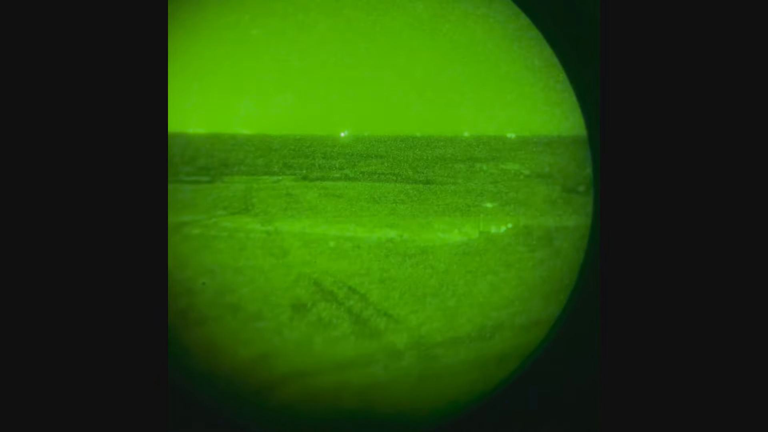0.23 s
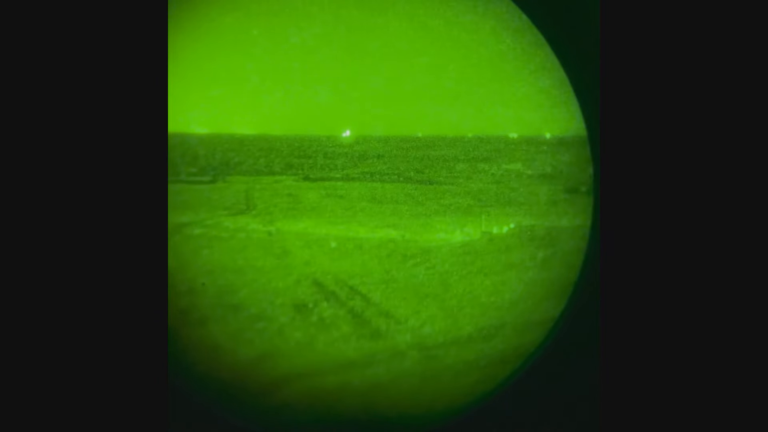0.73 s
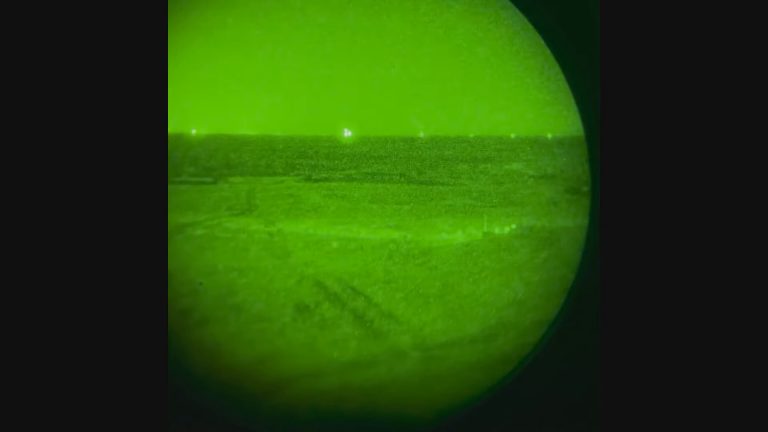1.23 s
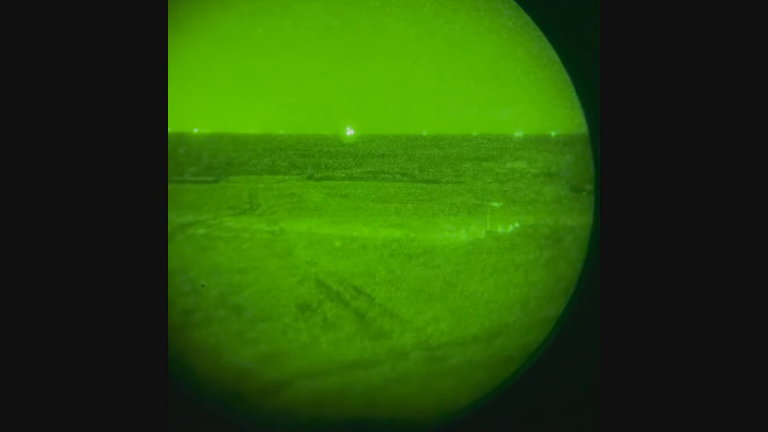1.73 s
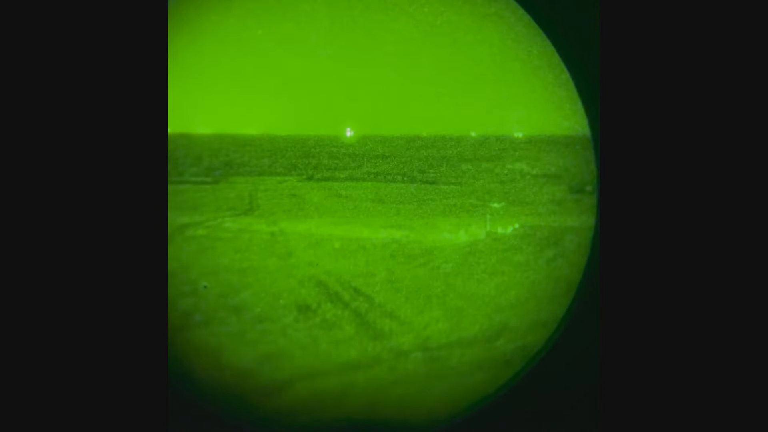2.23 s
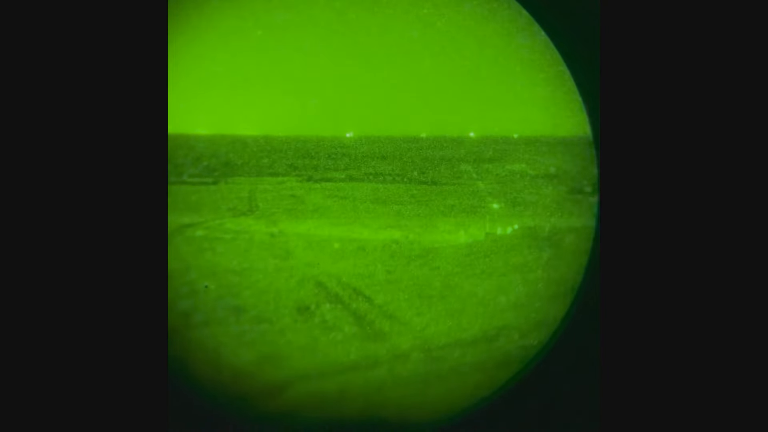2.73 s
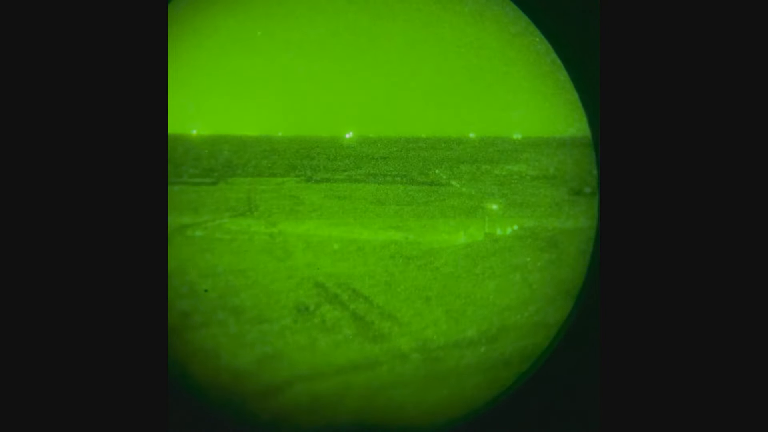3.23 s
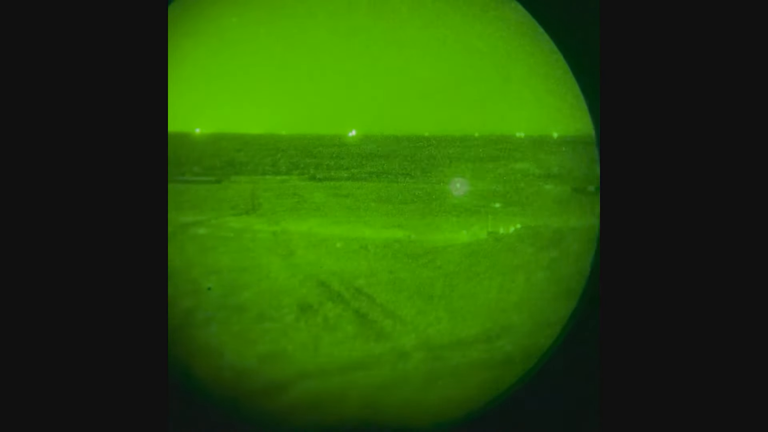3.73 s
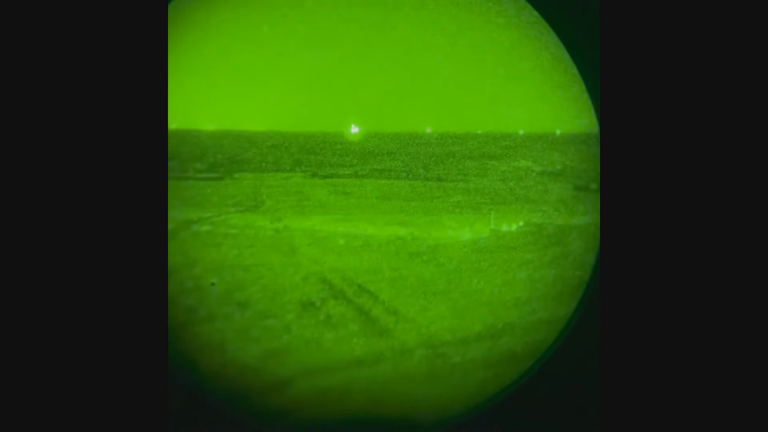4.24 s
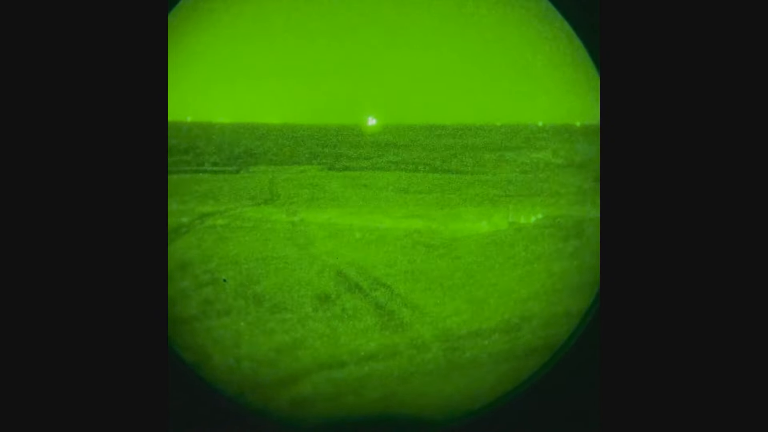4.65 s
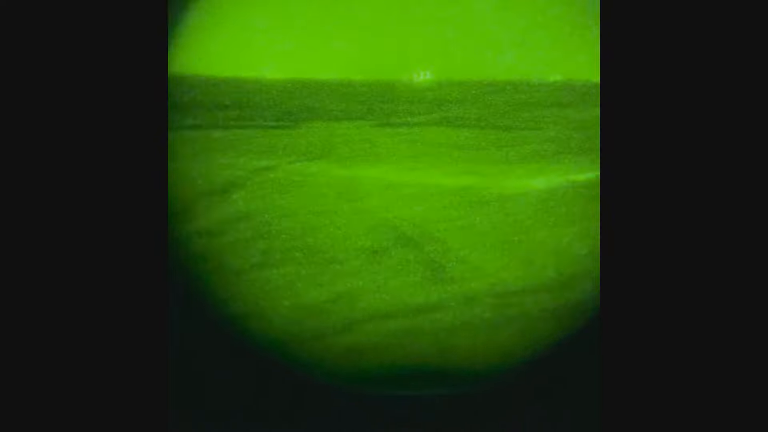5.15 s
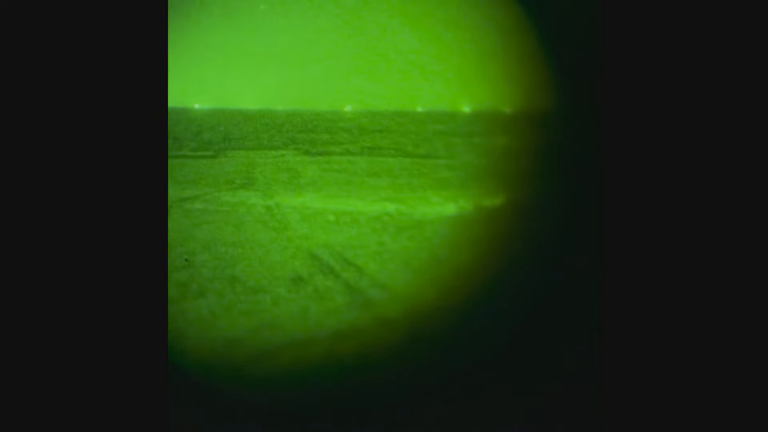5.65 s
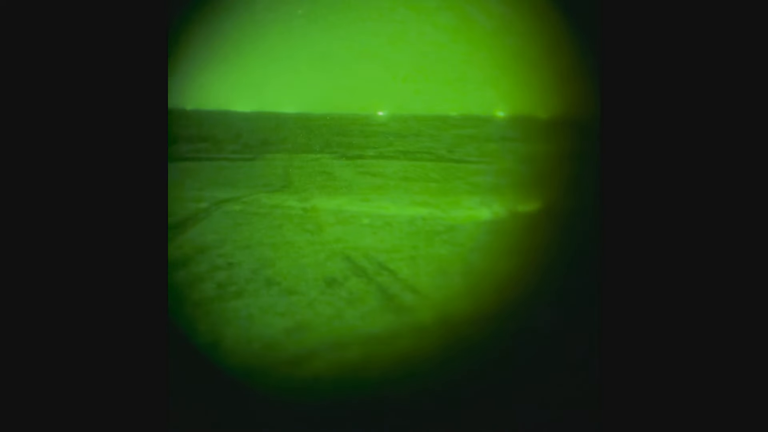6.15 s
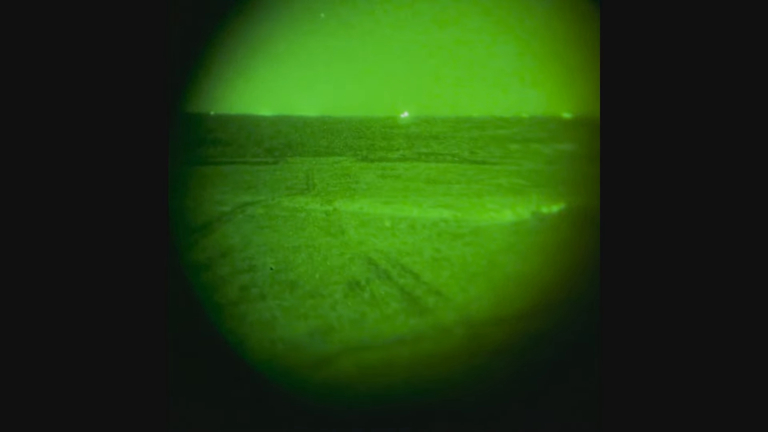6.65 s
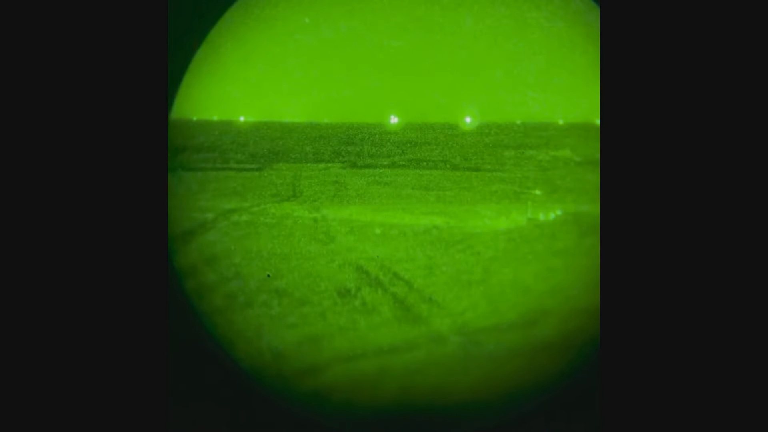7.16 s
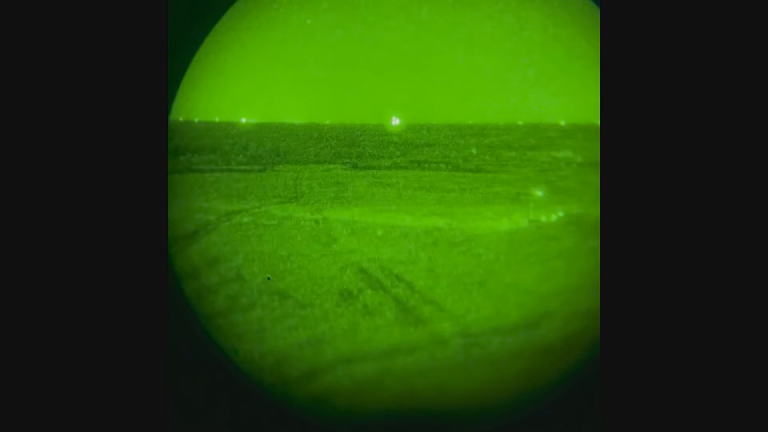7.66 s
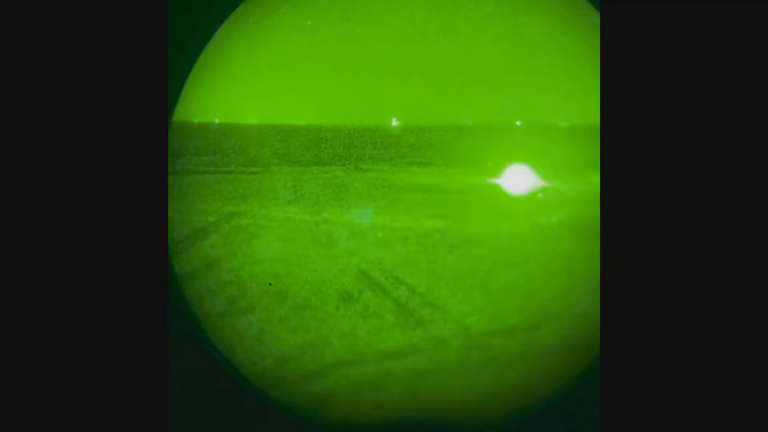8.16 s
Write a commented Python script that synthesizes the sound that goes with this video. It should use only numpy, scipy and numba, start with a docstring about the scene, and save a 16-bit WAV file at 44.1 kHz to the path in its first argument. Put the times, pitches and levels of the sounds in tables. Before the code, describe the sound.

Irregular, dulled gunshots pop far off across an open plain and fade, over the steady rumble and clatter of nearby idling diesel engines. A closer machine gun then fires about eleven rapid, cracking shots that echo off the banks, trailed by a brief falling ricochet whine. One hollow knock hits the phone microphone's case. The engines carry on until two sharp shots ring out at the close.

```python
"""A far gun rattles over two diesel engines idling close by, on a flat range at night.
Then a nearer machine gun fires bursts: each shot is a crack, a muzzle blast and a hiss of gas, which
banks and the plain reflect as a rolling echo. A ricochet whines past, and a knock on the phone's case
makes its limiter duck. The two microphone ports share the bass and part in phase above it."""
import sys
import numpy as np
from scipy import signal
from scipy.fft import rfft, irfft
from scipy.io import wavfile
from scipy.ndimage import uniform_filter1d, minimum_filter1d
from numba import njit

SR = 44100
rng = np.random.default_rng(int(sys.argv[2]) if len(sys.argv) > 2 else 0)


def dump(signal):
    """Clip the signal to [-1, 1] and save it as 16-bit WAV at the path in sys.argv[1]."""
    limited = np.clip(np.atleast_2d(signal).T, -1, 1)
    pcm = np.round(limited * 32767).astype(np.int16)
    wavfile.write(sys.argv[1], SR, pcm)


N = 370440
TIME = np.arange(N) / SR
HZ = np.fft.rfftfreq(N, 1 / SR) + 1e-6

# Idling engines. Each row: cycle rate in Hz, a list of (harmonic number, rms level in dB).
ENGINE_HARMONICS = [(19.65, [(3, -36.5), (4, -37.5), (5, -42.5), (6, -48.5), (7, -51), (8, -53.5),
                    (10, -55), (11, -58), (12, -54.5), (14, -52.5), (16, -55.5)]), (21.5, [(2, -48.5),
                    (3, -39.5), (4, -35), (6, -46.5), (7, -52.5), (9, -54.5), (11, -52.5), (13, -52.5)])]
# Spectrum of engine roar and clatter. Each row: frequency in Hz, relative level in dB.
ENGINE_SPECTRUM = [(30, -26), (50, 7.5), (90, 2.5), (200, 0), (320, -7), (500, -10.5), (900, -24.5),
                   (1600, -24.5), (2450, -26.5), (3000, -36.5), (4200, -30), (6200, -33), (7200, -31),
                   (7800, -34.5), (8800, -38), (10400, -38), (11300, -30.5)]
# Peaks and dips of the engine casing. Each row: centre in Hz, width in Hz, gain in dB.
CASING_RESONANCES = [(860, 116, 9.5), (1280, 200, 4), (1710, 50, 7), (1900, 120, -5), (2100, 44, 1.5),
                     (2420, 83, -2.5), (2540, 70, 3), (2745, 380, 10.5), (2730, 60, -7), (3730, 50, 6),
                     (4140, 44, 6.5), (4350, 50, -7), (4460, 41, 5.5)]
# Level of the faint high hiss above 8 kHz. Each row: time in seconds, gain in dB.
TREBLE_HISS_LEVEL = [(0, -3), (1.5, 3.5), (1.8, 9.5), (3, 1.5), (6.2, 6), (8.4, 4.5)]
# Faint ticks close by. Each row: start in seconds, level in dB.
TICK_EVENTS = [(1.6008, -36), (1.9594, -41), (2.58, -40), (6.5585, -40), (7.6869, -45)]
# Distant pings: far shots, then late echoes of the near gun.
# Each row: start in seconds, level in dB, pitch in Hz, T60 in seconds.
DISTANT_PINGS = [(0.0416, -19.5, 1975, .05), (0.1087, -34, 2270, .05), (0.1444, -16, 2324, 0.0423),
                 (0.1622, -21, 1753, .05), (0.238, -16.5, 2290, .04), (0.279, -21, 2240, 0.047),
                 (0.2857, -17, 2036, .05), (0.296, -22, 2040, .04), (0.327, -17, 2303, 0.0567),
                 (0.374, -15, 1990, 0.0564), (0.392, -18.5, 2020, 0.066), (0.4637, -16, 1990, .07),
                 (0.479, -23, 2060, .04), (0.513, -18.5, 2080, .05), (0.5261, -11.5, 1980, 0.014),
                 (0.617, -12.5, 2330, .045), (0.634, -19, 1845, .05), (0.75, -16.5, 2086, .05),
                 (0.855, -25.5, 2223, 0.1), (0.9393, -22.5, 2130, .07), (1.1034, -17, 2000, 0.0533),
                 (1.119, -20, 1840, .03), (1.135, -20.5, 1970, 0.092), (1.2312, -21.5, 2176, 0.061),
                 (4.44, -25, 1750, 0.0305), (4.544, -34, 1710, 0.036), (4.4787, -20, 1950, 0.0427)]
# Duller pops down range. Each row: start in seconds, level in dB, pitch in Hz.
DISTANT_POPS = [(0.274, -13.5, 780), (0.7424, -14, 700), (1.364, -20.5, 805), (4.481, -17, 1350),
                (7.715, -31, 785), (8.221, -35, 800)]
# Envelope of the far gun's echo. Each row: time in seconds, level in dB.
FAR_ECHO_LEVEL = [(0, -35), (1.2, -40.5), (1.6, -47.5), (2.6, -52), (3.1, -57)]
# Spectrum of that echo. Each row: frequency in Hz, relative level in dB.
FAR_ECHO_SPECTRUM = [(500, -12), (800, 1.5), (1100, 2.5), (1400, 3), (1900, 0.5), (2400, 3), (2750, -2.5),
                     (3300, -18.5), (4500, -22), (7000, -83)]
# Spectrum of the horizon's rumble. Each row: frequency in Hz, relative level in dB.
RUMBLE_SPECTRUM = [(60, -14), (130, -9.5), (300, -2.5), (550, -7.5), (1000, -17.5), (2400, -25.5),
                   (3200, -41)]
# Reverberation of the plain. Each row: band centre in Hz, near ground gain in dB, its T60 in seconds,
# far ground gain in dB, its T60 in seconds.
PLAIN_BANDS = [(78, -2.5, 0.16, -13, 4.2), (138.4, -9, 0.2, -17, 5.1), (262.4, -7, 0.19, -14, 3.14),
               (440, -16.5, 0.47, -21, 4.3), (820, -2.5, 0.072, -29, 1.6), (1420, -16.5, 0.17, -22, 4.7),
               (2120, -14.5, 0.16, -12, 1.8), (3150, -20.5, 0.13, -33, 1.2), (4190, -12, 0.066, -27, 3.05),
               (6200, -30.5, 0.41, -22.5, 1.5), (7000, -19, 0.13, -27, 0.56)]
# Reflecting banks. Each row: echo delay in seconds, gain in dB ahead of the echo filter.
BANK_REFLECTIONS = [(.018, -17), (.178, -9.5), (0.274, -4), (0.304, -14), (.382, -17), (.5, -13),
                    (.658, -6.5)]
# Filter on the echoes of banks and posts. Each row: frequency in Hz, gain in dB.
ECHO_FILTER = [(500, -26), (900, -9), (1400, -8), (2000, -4), (2500, -9), (2900, -33), (4200, -11),
               (5200, -25), (7100, -16.5), (8000, -41)]
# Spectrum of the muzzle gas. Each row: frequency in Hz, relative level in dB.
GAS_SPECTRUM = [(2500, -51), (3300, -9), (4300, 0.5), (5000, -2.5), (6000, -2.5), (7100, 4), (7900, -4),
                (10200, -8.5), (11000, -9.5)]
# Rings of the crack. Each row: frequency in Hz, T60 in seconds, gain in dB, dB added per dB of edge.
CRACK_RINGS = [(717, 0.025, -19, -0.1), (870, 0.041, -6, -0.44), (1025, 0.04, -13, -0.2),
               (1138, 0.046, -16, -0.82), (1346, 0.023, -5.5, -0.15), (1438, 0.025, -6.5, 0.32),
               (1530, 0.035, -3, -0.089), (1780, 0.027, -17, -0.076), (2015, 0.022, -17, 0.21),
               (2330, 0.045, 2, -0.36), (2790, 0.012, -9, 0.8), (2980, 0.0085, -15, 0.9),
               (3300, 0.0088, -21, 0.43)]
# Shots of the near gun. Each row: start in seconds, level in dB, extra gas hiss in dB,
# blast lag in milliseconds, edge of the crack in dB.
NEAR_SHOTS = [(3.1321, -20.5, 1.5, 2.65, -3), (3.2383, -21, 1, 2.57, -2), (3.3443, -21.5, 3, 2.8, 0),
              (3.4567, -22.5, 1, 2.3, 1), (3.5632, -20.5, 1.5, 2.04, 4), (3.668, -22.5, 4, 2.2, 2),
              (3.7795, -21.5, 4, 2, 6), (3.8838, -22, 4.5, 2.34, -3), (3.9912, -24, 6.5, 2.5, -4),
              (4.096, -24, 7, 3.05, -8), (4.2035, -21.5, 2.5, 2.05, -2), (8.2888, -22.5, -8, 2.4, 15),
              (8.3905, -23.5, -5, 2.4, 10.5)]
# The two microphone ports. Each row: frequency in Hz, phase lag of the right in radians,
# diffuse coherence from 0 to 1, left minus right in dB.
PORT_RESPONSE = [(200, 0, .97, 0), (400, .45, .95, -3), (650, 1.4, .55, 4), (830, .5, .8, 1),
                 (1030, 1.5, .35, 2), (1200, -1.2, .6, 4), (1600, .3, .85, 1.5), (2300, .7, .8, 2.5),
                 (2950, 2.9, .6, 0), (3500, 6.9, .5, -3), (4200, 7.9, .6, 4), (4850, 9.4, .9, 0),
                 (5900, 12.5, 1, 0), (7300, 13.9, .8, 0), (8300, 15.7, 1, 0), (9600, 15.8, 1, 0),
                 (11200, 17.7, .6, 0)]


def undb(db):
    """Decibels as an amplitude ratio."""
    return 10 ** (np.asarray(db) / 20)


def unit(x):
    """Scale to rms 1."""
    return x / np.sqrt(np.mean(x ** 2))


def curve(table):
    """Interpolate (seconds, value) rows at every sample."""
    return np.interp(TIME, *np.transpose(table))


def coloured(table, x):
    """Filter by (Hz, dB) points."""
    hz, db = np.transpose(table)
    return irfft(rfft(x) * undb(np.interp(np.log(HZ), np.log(hz), db)), N)


def band(x, hz, octaves):
    """Band-pass around hz."""
    edges = [hz * 2 ** (-octaves / 2), hz * 2 ** (octaves / 2)]
    return signal.sosfilt(signal.butter(2, edges, "band", fs=SR, output="sos"), x)


def walk(rate):
    """Smooth random drift, with rate new values a second and a spread near 1."""
    hold = int(SR / rate)
    steps = np.repeat(rng.standard_normal(N // hold + 1), hold)
    return 1.384 * uniform_filter1d(uniform_filter1d(steps, hold), hold)[:N]


def add(out, s, sound):
    """Mix a short sound in at s seconds."""
    i = int(s * SR)
    out[i:i + len(sound)] += sound[:N - i]


def rise(t, rise_s):
    """Smooth onset from 0 to 1."""
    return 1 - np.exp(-(t / rise_s) ** 2)


def ring(hz, t60, rough=0.35, rise_s=0.00041, octaves=0.33):
    """A damped oscillation, roughened by a band of noise as by air turbulence."""
    t = TIME[:int(t60 * SR)]
    grit = unit(band(rng.standard_normal(len(t)), hz, octaves))
    decay = 1000 ** (-t / t60) - 1 / 1000
    return (np.sin(2 * np.pi * hz * t) + rough * grit) * decay * rise(t, rise_s)


def engines():
    """Periodic firing makes exhaust harmonics and modulates the clatter. Returns (direct, diffuse)."""
    exhaust, throb = 0, 0
    for cycle_hz, harmonics in ENGINE_HARMONICS:
        cycles = np.cumsum(cycle_hz * (1 + 0.00399 * walk(2.5))) / SR
        for k, db in harmonics:
            amplitude = np.sqrt(2) * undb(db + 1.3 * walk(4))
            exhaust += amplitude * np.sin(2 * np.pi * (k * cycles + rng.random()))
        throb += np.exp(-(cycles % 1) / 0.71)
    casing_db = sum(db * np.exp(-((HZ - hz) / width) ** 2) for hz, width, db in CASING_RESONANCES)
    spectrum = rfft(unit(coloured(ENGINE_SPECTRUM, rng.standard_normal((2, N))))) * undb(casing_db)
    edges_hz = [0, 600, 1300, 2100, 3000, 4800, 6500, 8000, SR]
    roar, *clatter = (irfft(spectrum * ((HZ > lo) & (HZ <= hi)), N)
                      for lo, hi in zip(edges_hz, edges_hz[1:]))
    clatter[-1] *= undb(curve(TREBLE_HISS_LEVEL))
    # each band rattles on its own, and all surge together
    surge_db = 0.95 * walk(11)
    rattle = sum(part * undb(surge_db + 1.15 * walk(25) + .5 * walk(2.73)) for part in clatter)
    return exhaust, undb(-38 + walk(5.8)) * roar + unit(1 + 1.6 * throb) * undb(-38) * rattle


def ticks():
    """Heavily damped high rings are heard as tiny bright ticks."""
    out = np.zeros(N)
    for s, db in TICK_EVENTS:
        add(out, s, undb(db) * ring(10130, 0.014, rough=0.94))
    return out


def distant_reports():
    """Absorption over distance dulls far shots and the near gun's late echoes to pings and pops.
    Returns these as direct sound, and the far gun's rolling echo as diffuse sound."""
    hits = np.zeros(N)
    for s, db, hz, t60 in DISTANT_PINGS:
        add(hits, s - .06 * t60, undb(db) * ring(hz, t60, rough=0.7, rise_s=0.11 * t60, octaves=0.3))
        grit = ring(2074, 0.021, rough=1, rise_s=0.002, octaves=1)
        add(hits, s - .001, undb(db - 10) * grit)
        echo_s = s + 0.014 + .02 * rng.random()
        echo_hz = hz * 2 ** (.12 * rng.standard_normal())
        add(hits, echo_s, undb(db - 13.5) * ring(echo_hz, 0.035, rough=1.2, rise_s=0.0035, octaves=.4))
    for s, db, hz in DISTANT_POPS:
        pop = ring(hz, 0.023, rough=0.41, rise_s=0.0018, octaves=0.7)
        crack = ring(1270, 0.023, rough=0.86, rise_s=0.0012, octaves=0.24)
        add(hits, s - .001, undb(db) * (pop + undb(-9.5) * crack))
    hits = signal.sosfilt(signal.butter(8, 2700, fs=SR, output="sos"), hits)
    roll = unit(coloured(FAR_ECHO_SPECTRUM, rng.standard_normal((2, N))))
    roll *= undb(curve(FAR_ECHO_LEVEL) + 2.1 * walk(39.74))
    bass = unit(band(rng.standard_normal((2, N)), 330, 1.3)) * undb(-34) * 1000 ** (-TIME / 9.7)
    return hits, roll + bass


def ricochet(peak_s=4.735, peak_hz=2060, fall_octaves_per_s=3.1):
    """A tumbling bullet whines past: a fluttering tone that glides down in pitch."""
    t = TIME - peak_s
    hz = peak_hz * 2 ** (-fall_octaves_per_s * np.clip(t, -.5, .5))
    swell = np.exp(-(t / np.where(t < 0, .04, .075)) ** 2)
    level = swell * undb(-43 + 2.2 * walk(40))
    return level * np.sin(2 * np.pi * np.cumsum(hz * (1 + 0.005 * walk(60))) / SR)


def knock(start_s=5.31, gain_db=8):
    """An impact excites the damped modes of the phone's case."""
    out = np.zeros(N)
    # the click
    add(out, start_s, undb(-34) * ring(10000, 0.01, rough=0.46, octaves=0.62))
    add(out, start_s, undb(-40) * ring(12510, 0.006, rough=0.4, octaves=0.2))
    add(out, start_s, undb(-20) * ring(1500, 0.018, rough=0.25))
    add(out, start_s, undb(-38) * ring(5700, 0.011, rough=0.72))
    add(out, start_s, undb(-31) * ring(2600, 0.013, rough=0.27))
    # hollow rings
    t = TIME[:int(.03 * SR)]
    swell = np.exp(-((t - .003) / 0.0038) ** 2)
    hollow = np.sin(2 * np.pi * 530 * t) - undb(-5.5) * np.sin(2 * np.pi * 770 * t) * np.exp(-t / .006)
    add(out, start_s + .0009, undb(-14) * ring(963, 0.025, rough=.1))
    add(out, start_s + .0009, swell * hollow)
    # a low rebound, then a small bounce
    add(out, start_s + .0047, undb(22) * ring(225, 0.01, rough=0, rise_s=0.004))
    add(out, start_s + .0082, ring(60, 0.02, rough=0, rise_s=0.002))
    add(out, start_s + .032, undb(-26) * ring(520, 0.043))
    return undb(gain_db) * out


def horizon_rumble(rise_s=1, t60=12.14):
    """Incoherent returns from the horizon add in power, so the shots build a dull, lingering roar."""
    coarse_time = TIME[::441]
    shot_s, shot_db, *_ = np.transpose(NEAR_SHOTS)[:, :, None]
    age = np.maximum(coarse_time - shot_s, 0)
    each = undb(shot_db - 18) * rise(age, rise_s) * 1000 ** (-age / t60)
    level = np.interp(TIME, coarse_time, np.sqrt(np.sum(each ** 2, axis=0)))
    return level * undb(1.7 * walk(4.5)) * unit(coloured(RUMBLE_SPECTRUM, rng.standard_normal((2, N))))


def plain_echo():
    """Shots convolved with the plain's impulse response: near ground answers soon, far ground late."""
    impulses = np.zeros((1, N))
    for s, shot_db, *_ in NEAR_SHOTS:
        impulses[0, int(s * SR)] = undb(shot_db)
    t = TIME[:3 * SR]
    response = 0
    for hz, near_db, near_t60, far_db, far_t60 in PLAIN_BANDS:
        lumps_db = 3.6 * walk(59.4)[:len(t)]
        late = rise(t, 0.26) * undb(far_db + lumps_db) * 1000 ** (-t / far_t60)
        soon = rise(t, 5.1 / hz) * undb(near_db) * 1000 ** (-t / near_t60)
        response += (soon + late) * unit(band(rng.standard_normal((2, len(t))), hz, 0.63))
    return signal.fftconvolve(impulses, response, axes=1)[:, :N]


def bank_echoes(post_count=50, posts_t60=1.15):
    """Banks reflect each shot, posts and humps scatter it; moving air makes each return differ."""
    distance, size = rng.random((post_count, 2)).T
    posts_s = .12 + 0.97 * distance
    posts_db = -6 - 2.6 * np.log(1 - size) - 60 * posts_s / posts_t60
    reflectors = [(s, db, .026) for s, db in BANK_REFLECTIONS]
    reflectors += [(s, db, .016) for s, db in zip(posts_s, posts_db)]
    out = np.zeros(N)
    for shot_s, shot_db, *_ in NEAR_SHOTS:
        for delay_s, db, spread_s in reflectors:
            t = TIME[:int(spread_s * SR)]
            echo = rng.standard_normal(len(t)) * 1000 ** (-t / spread_s / 2) * np.minimum(t / .0035, 1)
            cutoff_hz = 8900 * .5 ** (delay_s / 0.36)  # air absorbs more treble on a longer path
            echo = signal.lfilter([1], [1, -np.exp(-2 * np.pi * cutoff_hz / SR)], echo)
            if shot_s + delay_s < TIME[-1]:
                add(out, shot_s + delay_s, undb(shot_db + db + 1.6 * rng.standard_normal()) * unit(echo))
    return coloured(ECHO_FILTER, out)


def gas_hiss():
    """Escaping gas makes broadband noise that starts with the crack and swells just after it."""
    t = TIME[:int(.02 * SR)]
    puff = (undb(-8.5) + np.exp(-((t - .0045) / 0.0012) ** 2)) / (1 + (t / 0.005) ** 4)
    level = np.zeros(N)
    for s, shot_db, hiss_db, *_ in NEAR_SHOTS:
        add(level, s, undb(shot_db + hiss_db - 2.5) * puff)
    return level * unit(coloured(GAS_SPECTRUM, rng.standard_normal(N)))


def muzzle_blast():
    """Dispersion over soft ground delays the lows, so the pulse falls in pitch."""
    ms = TIME[:int(.03 * SR)] * 1000
    chirp = np.tanh(1.1 * np.sin(np.pi * 1.32 * ms ** .58))
    return chirp * (.36 + .72 * np.tanh(ms / 3.3)) / (1 + (ms / 7.5) ** 6)


def near_gun(bounce_s=0.001527, bounce_db=1):
    """Each crack interferes with its ground reflection; a blast follows. Returns (direct, diffuse)."""
    shots = np.zeros(N)
    for s, shot_db, _, lag_ms, edge_db in NEAR_SHOTS:
        for hz, t60, db, edge_share in CRACK_RINGS:
            level = undb(shot_db + db + edge_share * edge_db)
            crack = level * ring(hz * (1 + 0.004 * rng.standard_normal()), t60, rough=0.15)
            add(shots, s, crack)
            add(shots, s + bounce_s, undb(bounce_db) * crack)
        blast_s = s + lag_ms / 1000
        add(shots, blast_s, undb(-10.1) * muzzle_blast())  # equally strong in every shot
        add(shots, blast_s - .00045, undb(-22.5) * ring(505, 0.06, rough=0.15))  # hollow ring
        add(shots, blast_s + .0024, undb(-24.5) * ring(310, 0.06, rough=0.1))  # lower bark
    hiss, roll = gas_hiss(), plain_echo()
    return shots + hiss + bank_echoes(), roll + horizon_rumble()


def ports(direct, diffuse):
    """Spaced ports receive sound with a phase lag; diffuse sound is only partly coherent in them."""
    hz, *columns = np.transpose(PORT_RESPONSE)
    lag, coherence, pan_db = (np.interp(HZ, hz, column) for column in columns)
    fade = np.minimum(np.minimum(TIME, TIME[::-1]) / .002, 1)
    common = rfft(direct * fade)
    own, other = rfft(diffuse * fade)
    left = (common + own) * undb(pan_db / 2)
    right = common + coherence * own + np.sqrt(1 - coherence ** 2) * other
    right *= np.exp(-1j * lag) * undb(-pan_db / 2)
    side = (left - right) / 2 * np.interp(HZ, (170, 330), (.15, 1))  # the bass is nearly mono
    mesh = undb(np.interp(HZ, (10600, 11800), (0, -48)))  # the port mesh takes off the top
    return irfft(mesh * ((left + right) / 2 + np.array([side, -side])), N)


@njit
def limiter_gain(peak, ceiling, hold_samples, release):
    """Gain varies inversely with a peak envelope above the ceiling: instant attack, hold, release."""
    gain, envelope, wait = np.empty(len(peak)), 0., 0.
    for i in range(len(peak)):
        if peak[i] >= envelope:
            envelope, wait = peak[i], hold_samples
        elif wait > 0:
            wait -= 1
        else:
            envelope *= release
        gain[i] = min(1., ceiling / (envelope + 1e-9))
    return gain


def scene():
    """Airborne sounds superpose at the ports; the structure-borne knock reaches both channels alike."""
    direct, diffuse = zip(near_gun(), distant_reports(), engines())
    return ports(sum(direct) + ricochet() + ticks(), sum(diffuse)) + knock()


def record(dry):
    """The microphone drops the deepest bass, a limiter ducks on peaks, and a low-pass cuts the top."""
    dry = signal.sosfilt(signal.butter(1, 30, "high", fs=SR, output="sos"), dry)
    release = float(undb(-170 / SR))  # 170 dB a second
    gain = limiter_gain(np.abs(dry).max(axis=0), ceiling=0.46, hold_samples=.1 * SR, release=release)
    gain = uniform_filter1d(minimum_filter1d(gain, size=41), size=41)
    return signal.sosfilt(signal.ellip(8, .2, 70, 13800, fs=SR, output="sos"), dry * gain)


dry = scene()
out = record(dry)
dump(out)
```